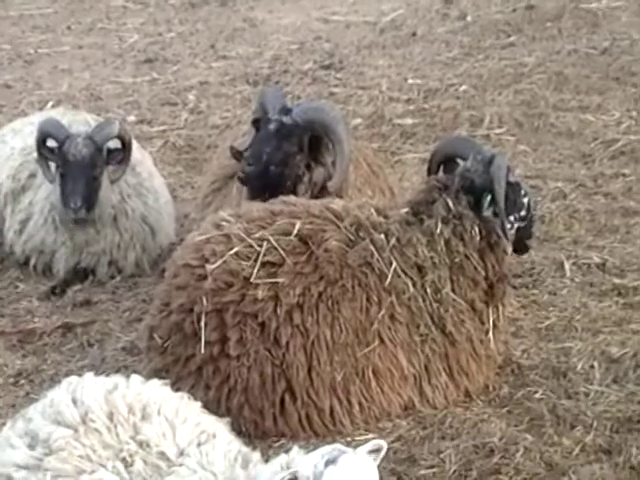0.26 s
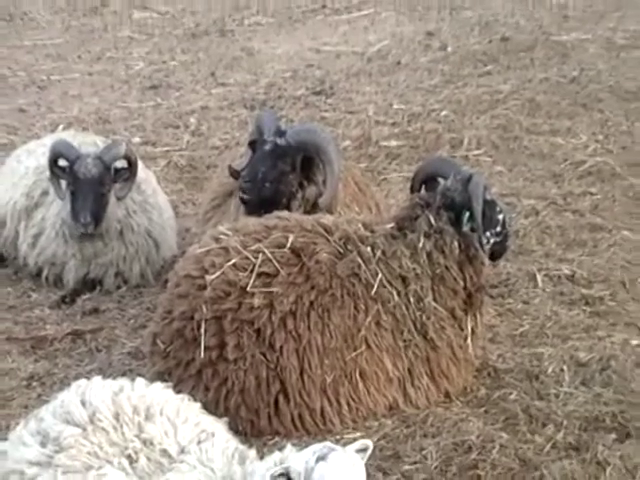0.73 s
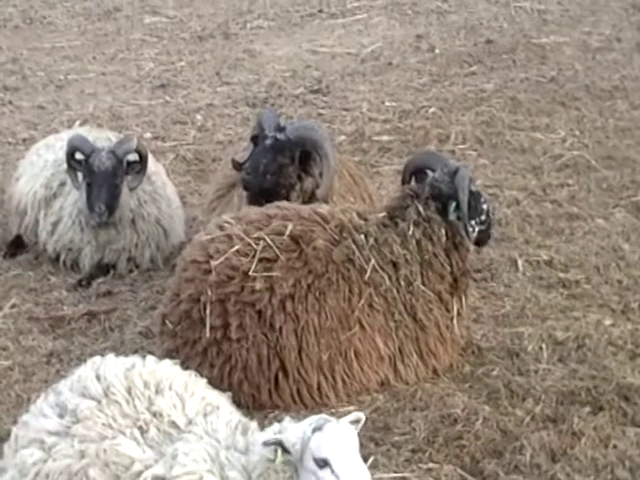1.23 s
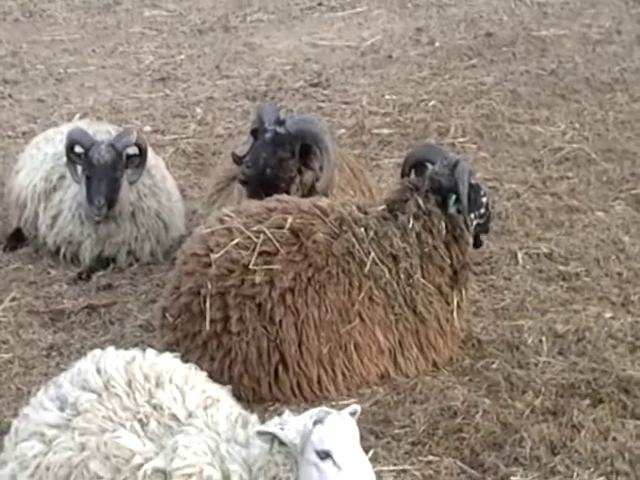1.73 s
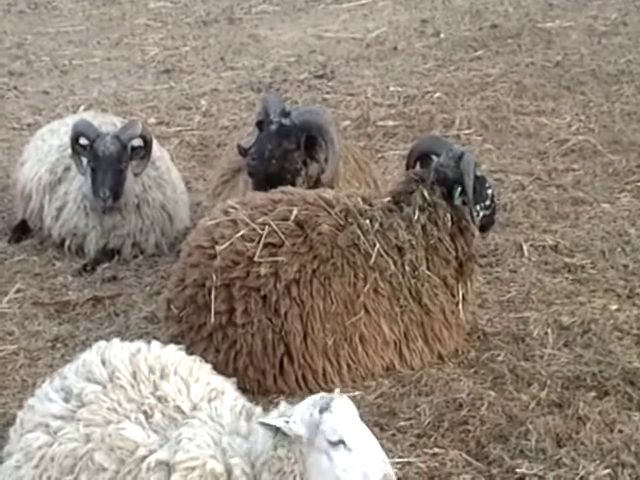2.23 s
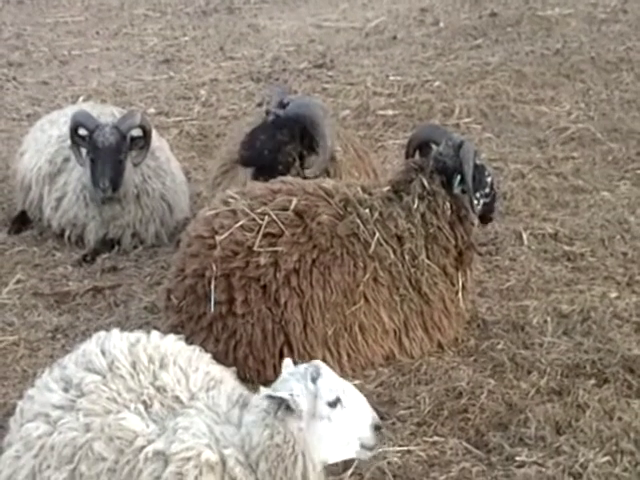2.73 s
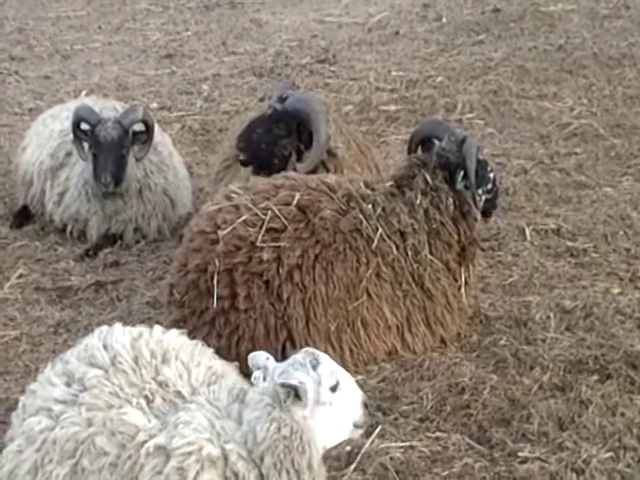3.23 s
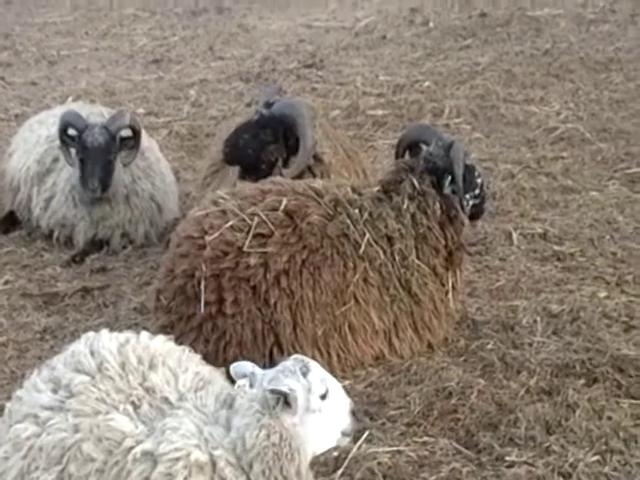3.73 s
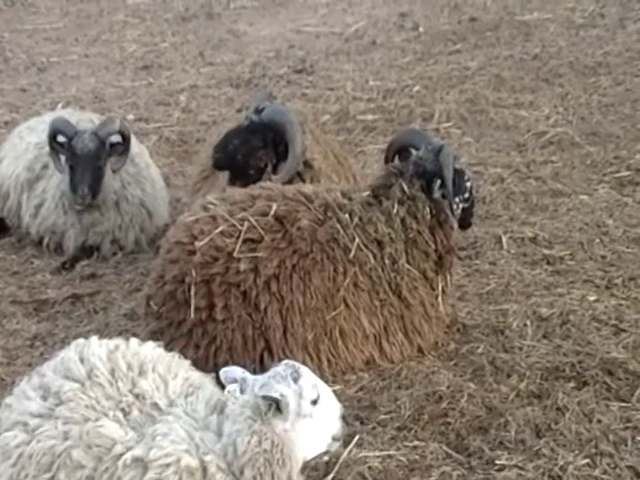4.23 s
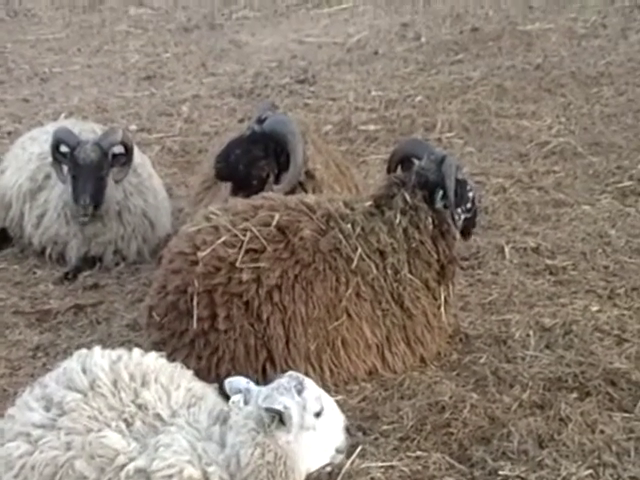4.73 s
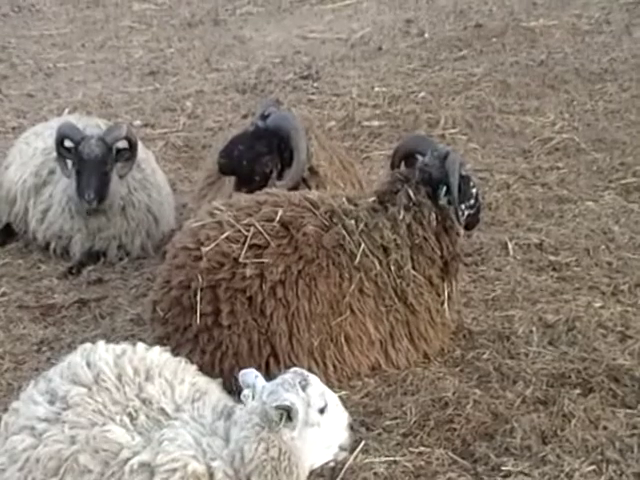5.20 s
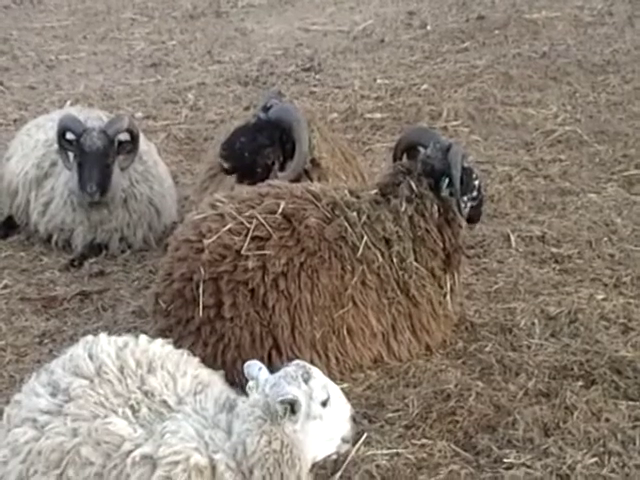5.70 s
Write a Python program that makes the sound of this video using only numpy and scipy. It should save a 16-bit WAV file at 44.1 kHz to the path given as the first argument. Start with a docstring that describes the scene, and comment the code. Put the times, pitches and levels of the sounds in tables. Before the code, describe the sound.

A rooster crows loudly nearby, then a distant sheep bleats softly while small birds chirp over a faint engine hum.

```python
"""An open farm pen, on a stereo microphone. Close by on the left a rooster crows once, its syrinx pulsing
through its throat: two short rasping notes, a loud held one and a long falling drawl as the air runs out.
Further off a sheep hums, then bleats, its mouth narrowing at the end. Small birds chirp, whistle and buzz,
and the calls echo off sheds and trees. There are dry snaps and rustles, and a soft low rumble near the end.
A distant engine hums throughout, under soft outdoor air."""
import sys
import numpy as np
from scipy import signal
from scipy.fft import rfft, irfft, next_fast_len
from scipy.io import wavfile
from scipy.ndimage import uniform_filter1d, minimum_filter1d

SR = 44100
rng = np.random.default_rng(int(sys.argv[2]) if len(sys.argv) > 2 else 0)


def wav_record(signal):
    """Record a signal, one row per channel, as 16-bit PCM in the file named by sys.argv[1]."""
    frames = np.transpose(np.atleast_2d(signal))
    bounded = np.clip(frames, -1, 1)
    # unit amplitude maps onto the largest positive 16-bit level
    quanta = np.round(bounded * 32767).astype(np.int16)
    wavfile.write(sys.argv[1], SR, quanta)


N = 262836
T = np.arange(N) / SR
SIZE = next_fast_len(2 * N)
BINS = np.maximum(np.arange(SIZE // 2 + 1) * SR / SIZE, 1)  # [Hz]

# three times the rooster's voice breaks upwards into full cry (start [s], end [s])
CRY_SPANS = [(.808, 0.87), (1.006, 1.164), (1.209, 1.642)]
DRAWL_START_S, BREAK_S = CRY_SPANS[-1][1], .0082  # a change of register takes BREAK_S


def rooster(break_hz=640):
    """Close by: the syrinx rings the throat, in a low register or full cry; the closing beak darkens it."""
    # throat resonances at full cry, in the low register, beak shut (centre [Hz], width [Hz], gain [dB])
    cry_modes = [(681, 80, 2.5), (740, 237, -3), (1180, 240, -8.5), (1639.7, 164, 1.5), (2160, 390, -22),
                 (3142, 300, -14.5), (4450, 370, -31.5), (4940, 300, -26), (5400, 360, -36),
                 (7600, 380, -39), (8710, 400, -43), (10200, 1700, -55.5), (13890, 2200, -60)]
    low_modes = [(630, 140, 4), (1030, 560, -1), (1600, 620, -4.5), (2086, 130, -2.5), (2764, 110, -12),
                 (3058, 200, -3), (4470, 370, -16.5), (4963, 180, -15.5), (4850, 700, -32),
                 (7680, 520, -30), (8800, 500, -40), (12700, 3500, -50.5)]
    shut_modes = [(406, 120, -18), (717.3, 140, 1.5), (1418, 630, -11), (2820, 170, -29)]
    # dips where side cavities swallow the sound (centre [Hz], width [Hz], gain [dB])
    cavities = [(2426, 160, -9), (3760, 200, -8), (6250, 380, -6)]
    hz, loudness = crow_gesture()
    dips_db = sum(db * bell(BINS, centre, width) for centre, width, db in cavities)
    source = ground_bounce(shape(syrinx(hz), undb(dips_db)))
    crying = (1 + np.tanh((hz - break_hz) / 35)) / 2
    voice = blend(throat(source, low_modes, low_hz=490), throat(source, cry_modes, low_hz=648), crying)
    beak_shut = blend(.18, .85, (T - 2.287) / .13)  # 0 open, 1 shut
    voice = blend(hollow_start(voice), throat(source, shut_modes, low_hz=390), beak_shut)
    return steady(voice, size=400) * loudness


def crow_gesture(low_hz=586, scoop_hz=70, sag_hz=90.7, punch_db=2, fade_db_per_s=4.5):
    """Pitch and loudness of the crow: a low voice jumps into each cry, then sinks as the air runs out."""
    # the two breaths of the crow (start [s], end [s], release [s])
    breaths = [(.753, .922, .025), (.976, 2.486, .014)]
    # pitch lines of the three cries and the closing drawl (time [s], pitch [Hz])
    first_cry = [(.83, 778.9)]
    second_cry = [(1.02, 795.1), (1.042, 838.6), (1.092, 856.7), (1.114, 842.4), (1.136, 785), (1.15, 766)]
    long_cry = [(1.232, 686.6), (1.244, 690.5), (1.27, 785.1), (1.37, 762.6), (1.4, 811.2), (1.42, 786.9),
                (1.514, 817.9), (1.592, 882.0), (1.62, 818.0)]
    drawl_pitch = [(1.65, 548.8), (1.758, 547.4), (1.808, 553.8), (1.99, 514.4), (2.06, 517.3),
                   (2.102, 500), (2.192, 498.2), (2.282, 480), (2.336, 464.2), (2.41, 429.5),
                   (2.426, 409.6), (2.444, 379), (2.47, 347.4)]
    sounding = sum(gate(start, end, .014, release) for start, end, release in breaths)
    pressure = sum(gate(start, end, .032, .032) for start, end, _ in breaths)
    scooped_hz = low_hz - scoop_hz * (1 - pressure)  # flat while pressure builds and ebbs
    drawl_s = T - DRAWL_START_S + BREAK_S
    hz = np.where(drawl_s > 0, curves(drawl_pitch)[0], scooped_hz)
    db = np.where(drawl_s > 0, -25.5 - fade_db_per_s * drawl_s, -24.5)
    for (start, end), cry in zip(CRY_SPANS, (first_cry, second_cry, long_cry)):
        crying = gate(start, end, BREAK_S, BREAK_S)
        sag = sag_hz * (1 - gate(start, end, BREAK_S, .03))
        punch = punch_db * np.exp(-np.abs(T - start) / .019)
        hz = blend(hz, curves(cry)[0] - sag, crying)
        db = blend(db, -14 + punch, crying)
    return hz, sounding * undb(db + 1.42 * wander(22))


def syrinx(hz, hoarseness=.036, jitter=.15, shimmer=.34, flutter_hz=44):
    """Pulses that flutter, double their period and tip into chaos, with air rushing through each cycle."""
    # bursts of chaos, mostly at onsets and register breaks (start [s], end [s], roughness [0 is clean])
    rasps = [(.745, 0.79, 0.85), (0.813, 0.931, 0.66), (.97, 1.008, 0.61), (1.008, 1.061, 0.9),
             (1.149, 1.191, .75), (1.207, 1.242, .65), (1.333, 1.365, .5), (1.495, 1.623, 1.1),
             (2.425, 2.51, .6)]
    strain = gate(1.25, 1.66, .014, .3)  # the long cry flutters, most at first
    bursts = sum(depth * gate(start, end, .006, .022) for start, end, depth in rasps)
    rough = hoarseness + .06 * strain + bursts
    flutter = np.sin(turn(flutter_hz * (1 + .15 * wander(15))))
    vibrato = (.0025 + .025 * strain) * flutter
    phase = turn(hz * (1 + vibrato + .0047 * wander(140) + jitter * rough * wander(300)))
    # strong and weak pulses alternate, which puts faint lines between the harmonics
    doubling = (.04 + .018 * strain) * (1 + .5 * wander(12)) * np.cos(phase / 2)
    strength = 1 + doubling + (.03 + shimmer * rough) * wander(150)
    strength *= 1 + .25 * strain * flutter
    rush = (.099 + 1.5 * rough) * noise()
    rush += (1 + 1.5 * strain) * shape(noise(), BINS / np.hypot(BINS, 9000))  # blurs the upper harmonics
    return pulses(phase, hz, count=32) * strength + (1 + np.cos(phase)) * rush


def hollow_start(voice, centre_hz=1890, width_hz=520, dip_db=-13):
    """Right after the long cry the middle harmonics are weak; they return as the throat opens."""
    hollow = shape(voice, undb(dip_db * bell(BINS, centre_hz, width_hz)))
    return blend(voice, hollow, gate(DRAWL_START_S, 1.92, BREAK_S, .13))


def ground_bounce(x, lag_s=.0026, bounce=.21):
    """A second path off the ground makes each harmonic swell and fade as the pitch slides."""
    sway = 1 + .037 * wander(5.1)  # the bird moves a little
    late = np.interp(T - lag_s * sway, T, x)
    return (x + bounce * late) / np.hypot(1, bounce)


def sheep(start_s=3.715, end_s=4.69, narrow_s=4.406, pitch_hz=206.7, rise_hz_per_s=14):
    """Further off: breathy pulses ring the throat in a trembling bleat, softer as the mouth narrows."""
    # throat resonances with the mouth open, then narrowed (centre [Hz], width [Hz], gain [dB])
    open_modes = [(205, 71, -2), (399, 30, -4), (737, 190, 4.5), (832, 83, 8.5), (1120, 500, -12),
                  (1630, 510, -1), (1985, 120, 4), (2990, 1300, -6), (3800, 120, 0.5), (5000, 1100, -15),
                  (6080, 310, -14.5)]
    narrow_modes = [(632.4, 260, 5.5), (910, 140, -20), (1490, 1200, -10), (2000, 170, 2), (3000, 770, -3),
                    (4770, 1000, -8.5)]
    # catches in the voice, where the pitch dips and recovers (time [s], dip [Hz])
    catches = [(3.756, 16), (3.807, 20.2), (4.062, 8.22), (4.36, 13), (4.595, 15)]
    dips_hz = sum(dip * spike(s, .0094, .03) for s, dip in catches)
    hz = pitch_hz + rise_hz_per_s * (T - start_s) - dips_hz
    phase = turn(hz * (1 + .00545 * wander(63)))
    source = pulses(phase, hz, count=36) + (1 + np.cos(phase)) * noise()
    narrowed = (1 + np.tanh((T - narrow_s) / .065)) / 2
    voice = blend(throat(source, open_modes, low_hz=147), throat(source, narrow_modes, low_hz=150), narrowed)
    loudness = gate(start_s, end_s, .11, .052) * undb(-49.5 - 10 * narrowed)
    tremble = 1 + .046 * wander(12)
    return voice * tremble * loudness


def sheep_murmur(at_s=3.3, hz=197, db=-55):
    """Ahead of the bleat the sheep hums briefly behind closed lips."""
    phase = turn(hz * (1 + .035 * wander(32)))
    return undb(db) * bell(T, at_s, .085) * (np.sin(phase) + .16 * np.sin(2 * phase))


def birds(waver=.0072, flicker=.1):
    """Whistles gliding through three pitches; scratchy ones swell more softly and shake in pitch and level."""
    out = np.zeros(2 * N)
    wobble, swell, shake = wander(350), wander(90), wander(200)
    for s, length, start, middle, end, db, scratch in bird_notes():
        progress = np.linspace(0, 1, max(int(length * SR), 8))
        span = max(int(s * SR), 0) + np.arange(len(progress))
        wrapped = span % N
        glide_hz = np.polyval(np.polyfit([0, .5, 1], [start, middle, end], 2), progress)
        hz = glide_hz * (1 + (waver + .13 * scratch) * wobble[wrapped])
        arch = 1.7 * np.abs(np.sin(np.pi * progress)) ** (.45 + 1.3 * scratch)
        tremble = 1 + flicker * swell[wrapped] + .5 * scratch * shake[wrapped]
        out[span] += undb(db) * arch * tremble * np.sin(turn(hz))
    return out[:N]


def bird_notes(tick_s=.011, tick_gap_s=.0158, twitter_notes=7):
    """The calls as notes (time [s], length [s], start, middle, end [Hz], level [dB], scratchiness [0-1])."""
    # one songbird's phrase (offset [s], length [s], start [Hz], middle [Hz], end [Hz], level [dB])
    phrase = [(0, .008, 5700, 6596, 7470, -61.5), (0.021, 0.01, 7100, 7545, 8200, -54),
              (0.042, .017, 5850, 5600, 4700, -51.5), (0.085, .03, 4350, 4734, 4500, -49)]
    # each start of that phrase (time [s])
    phrase_starts = [0.43, .574, 0.718, .869, 1.163]
    # down-slurred calls (time [s], length [s], start [Hz], level [dB])
    slurs = [(0.364, 0.032, 3870, -49), (4.043, .051, 4540, -56.5), (4.215, .039, 4500, -51),
             (4.349, .058, 4200, -50.5), (4.484, 0.054, 4200, -53), (4.63, 0.057, 4120, -60),
             (5.24, 0.03, 3650, -64), (5.516, 0.031, 3600, -60.5), (5.729, .027, 3800, -58.5)]
    # runs of sharp falling ticks (time [s], ticks [count], start [Hz], level [dB])
    tick_runs = [(1.83, 1, 6425, -57), (2.97, 1, 5687, -67), (4.908, 2, 6590, -56.5),
                 (5.291, 2, 7150, -60.5), (5.522, 1, 6740, -65), (5.702, 2, 6810, -69),
                 (5.845, 4, 6750, -67)]
    # thin whistles and scratchy scolding notes (time [s], length [s], start [Hz], end [Hz], level [dB])
    whistles = [(0, 0.094, 3750, 3700, -49.5), (.21, 0.088, 7570, 7450, -58.5),
                (0.216, 0.073, 7270, 7050, -56.5), (2.548, 0.091, 4000, 3650, -65.5),
                (4.18, 0.044, 4780, 4420, -53), (4.795, 0.35, 4200, 4250, -69.5),
                (5.093, 0.12, 5450, 5080, -63), (5.175, .23, 1914, 1628, -61.5),
                (5.362, .12, 3380, 2800, -67.5), (5.857, 0.11, 3460, 3450, -56.5)]
    scolds = [(0, .04, 3950, 3496, -50.5), (0.311, .06, 4120, 3950, -63), (2.581, 0.117, 3590, 3390, -61),
              (3.739, 0.103, 3410, 3400, -55), (4.925, .05, 3700, 3550, -61.5),
              (5.775, .11, 3850, 2500, -53.5)]
    # loose strings of random notes: faint high pips, then a low warble
    # (start [s], end [s], note length [s], pitch [Hz], pitch scatter [share], level [dB])
    twitters = [(2.757, 3.5, 0.044, 7080, 0.016, -77), (4.26, 4.483, 0.02536, 1600, 0.202, -54.5)]
    notes = [(at + s, *note, 0) for at in phrase_starts for s, *note in phrase]
    notes += [(s, length, hz, hz * .895, hz * .73, db, .08) for s, length, hz, db in slurs]
    notes += [(s + k * tick_gap_s, tick_s, hz, hz * .85, hz * .65, db, .2)
              for s, ticks, hz, db in tick_runs for k in range(round(ticks))]
    for calls, scratch in ((whistles, .03), (scolds, .56)):
        notes += [(s, length, start, (start + end) / 2, end, db, scratch)
                  for s, length, start, end, db in calls]
    for start, end, length, hz, scatter, db in twitters:
        for k, (late, loud, *bends) in enumerate(rng.uniform(-1, 1, (twitter_notes, 5))):
            s = start + (end - start) * (k + .2 * late) / twitter_notes
            pitches = hz * (1 + scatter * np.array(bends))
            notes.append((s, length, *pitches, db + 3 * loud, scatter))
    return notes


def buzzing_bird(start_s=5.18, end_s=5.685, pitch_hz=4620, rise_hz_per_s=920, trill_hz=325, db=-53.5):
    """A slowly rising whistle, trilled so fast that it buzzes."""
    hz = pitch_hz + rise_hz_per_s * (T - start_s)
    trill = turn(trill_hz * (1 + .0299 * wander(42)))
    phase = turn(hz * (1 + .00492 * wander(179))) + .93 * np.sin(trill)
    throb = 1 + .66 * np.cos(trill + 1.53)
    return unit(throb * np.sin(phase)) * undb(db) * gate(start_s, end_s, .048, .048)


def rustles_and_rumble(grain_spread_db=9.3):
    """Dry snaps and rustles, and a soft low rumble near the end: each a burst of grainy noise."""
    # snaps, rustles and rumble (time [s], rise [s], fall [s], centre [Hz], width [Hz], peak level [dB])
    bursts = [(0.123, 0.00081, 0.003, 1060, 2960, -43), (0.434, 0.00094, 0.0045, 1430, 1800, -48.5),
              (2.39, .001, 0.0034, 9020, 9266, -54.5), (3.62, 0.0059, 0.027, 1516, 709, -59.5),
              (4.19, .001, 0.0035, 8000, 6950, -58), (5.24, 0.0087, 0.06, 292, 157.8, -53.5),
              (5.35, 0.018, 0.052, 305, 200, -55.5), (5.776, 0.036, 0.083, 4710, 4810, -57.5)]
    out = 0
    for s, rise, fall, hz, width, db in bursts:
        clicks = noise() * undb(grain_spread_db * noise())
        grains = unit(resonate(clicks, [(hz, width, 0)], low_hz=205))
        out += undb(db) * grains * spike(s, rise, fall)
    return out


def engine():
    """Far off: the low tones of a motor, swaying together in pitch and separately in level."""
    # the motor's hum (frequency [Hz], level [dB])
    hum_tones = [(53.9, -67.5), (95, -66.5), (107.9, -57), (117, -71.5), (149, -73), (162, -64), (228, -69),
                 (251, -76.5)]
    speed = 1 + .0025 * wander(3.3)
    out = 0
    for hz, db in hum_tones:
        tone = np.sin(turn(hz * speed) + rng.uniform(0, 2 * np.pi))
        out += undb(db) * unit(tone * (1 + .22 * wander(4.7)))
    return out


def outdoor_air(mid_db=-56):
    """Soft air all round the microphone; the bass is alike on both sides, the treble is wider."""
    # spectrum of the air (frequency [Hz], relative level [dB])
    air_spectrum = [(15, -53), (25, -16.5), (113, -5), (246, -11.5), (421, -18.5), (495, -37.5),
                    (598, -18.5), (782, -21), (848, -20), (1140, -30), (1570, -25.5), (2170, -30),
                    (3830, -31), (4150, -32), (15500, -51)]
    colour = undb(spectra(air_spectrum)[0])
    width = .22 + BINS / (BINS + 1500)
    mid, side = shape(noise(), colour), shape(noise(), colour * width)
    stereo = (mid + side * np.array([[1], [-1]])) / np.std(mid)
    return stereo * undb(mid_db + .27 * wander(4))


def yard_echo(x, wet_db, t60_s, dull_hz, build_s=.0027):
    """Scattered echoes off sheds and trees, different on each side; they build up quickly and die away."""
    decay = np.exp(-np.log(1000) * T / t60_s) * np.clip(T / build_s, 0, 1)
    tails = [noise() * decay / np.sqrt(np.sum(decay ** 2)) for _ in range(2)]
    return undb(wet_db) * shape(x, rfft(tails, SIZE) / np.hypot(1, BINS / dull_hz))


def from_left(x):
    """A sound from the left reaches the two microphone ports with a different level and phase."""
    # left port against right (frequency [Hz], level difference [dB], phase lead [rad])
    ports = [(200, 2.5, 0), (750, -0.5, 0.33), (1100, 0, 1.2), (1528, 8, 0.32), (1960, 7.5, 0.99),
             (2600, 8, -0.6), (3246, 3, 0.65), (5000, 1.5, .7), (8000, 1.5, .5), (13000, 0, 1.8)]
    db, lead = spectra(ports)
    left = undb(db / 2) * np.exp(1j * lead / 2)
    pair = np.array([left, 1 / left])
    return shape(x, pair / np.abs(pair.mean(axis=0)))


def throat(source, modes, low_hz):
    """The source as it leaves a throat of one shape, at an even level."""
    return steady(resonate(source, modes, low_hz))


def resonate(x, modes, low_hz):
    """A causal filter of steep-sided resonances, dark below low_hz."""
    power = sum(undb(db) ** 2 / (1 + ((BINS - hz) / width * 2) ** 2) ** 2 for hz, width, db in modes)
    power = power / (1 + (low_hz / BINS) ** 12) + 1e-10
    cepstrum = irfft(np.log(power), SIZE)
    cepstrum[0] /= 2
    cepstrum[SIZE // 2:] = 0  # minimum phase: the ringing follows the pulse
    return shape(x, np.exp(rfft(cepstrum)))


def pulses(phase, hz, count):
    """One sharp pulse a cycle: up to count equal harmonics, within the range of hearing."""
    return sum(np.cos(k * phase) * (k * hz < SR / 2.2) for k in range(1, count + 1))


def turn(hz):
    """Phase of an oscillator."""
    return 2 * np.pi * np.cumsum(hz) / SR


def noise():
    """White noise."""
    return rng.standard_normal(N)


def wander(hz):
    """Smooth random drift of rms 1, mostly slower than hz."""
    return unit(shape(noise(), bell(BINS, 0, hz)))


def shape(x, gain):
    """Filter by a gain per frequency."""
    return irfft(rfft(x, SIZE) * gain, SIZE)[..., :N]


def steady(x, size=660):
    """Even out the slow level, keeping the fast grain."""
    return x / np.sqrt(np.maximum(uniform_filter1d(x ** 2, size), 0) + 1e-9)


def gate(start, end, attack, release):
    """Attack, hold at 1, release; times in seconds."""
    return np.clip(np.minimum((T - start) / attack, (end - T) / release), 0, 1)


def spike(at_s, rise_s, fall_s):
    """Exponential rise to 1 and fall."""
    return np.exp(-np.maximum((at_s - T) / rise_s, (T - at_s) / fall_s))


def bell(x, centre, width):
    """Gaussian bump of height 1."""
    return np.exp(-((x - centre) / width) ** 2)


def blend(a, b, share):
    """Cross-fade from a to b."""
    share = np.clip(share, 0, 1)
    return a * (1 - share) + b * share


def curves(table):
    """Each column of a table as a line through time."""
    s, *columns = np.transpose(table)
    return [np.interp(T, s, c) for c in columns]


def spectra(table):
    """Each column of a table as a line over log frequency."""
    hz, *columns = np.transpose(table)
    return [np.interp(np.log(BINS), np.log(hz), c) for c in columns]


def undb(db):
    """Decibels to gain."""
    return 10 ** (np.asarray(db) / 20)


def unit(x):
    """Scale to rms 1."""
    return x / np.sqrt(np.mean(x ** 2))


def scene():
    """Rooster, sheep and rustles to the left, birds near the centre; further callers carry more echo."""
    crow = rooster()
    bleat = sheep() + sheep_murmur()
    song = birds() + buzzing_bird()
    direct = from_left(crow + bleat + rustles_and_rumble()) + song * undb([[.5], [-.5]])
    echoes = yard_echo(crow, wet_db=-8, t60_s=.19, dull_hz=8000)
    echoes += yard_echo(crow, wet_db=-21.5, t60_s=.8, dull_hz=5000)
    echoes += yard_echo(bleat, wet_db=-2.5, t60_s=.81, dull_hz=6000)
    echoes += yard_echo(song, wet_db=-4.5, t60_s=.71, dull_hz=8000)
    return direct + echoes + engine() + outdoor_air()


def record(dry, ceiling=.62, low_hz=46, top_hz=15650):
    """The recorder drops the deepest bass, limits the peaks and cuts the top."""
    x = signal.sosfilt(signal.butter(6, low_hz, "highpass", fs=SR, output="sos"), dry)
    allowed_gain = np.minimum(1, ceiling / (np.abs(x).max(axis=0) + 1e-9))
    limited = x * uniform_filter1d(minimum_filter1d(allowed_gain, size=200), size=200)
    return signal.sosfilt(signal.ellip(10, .2, 80, top_hz, fs=SR, output="sos"), limited)


dry = scene()
out = record(dry)
wav_record(out)
```